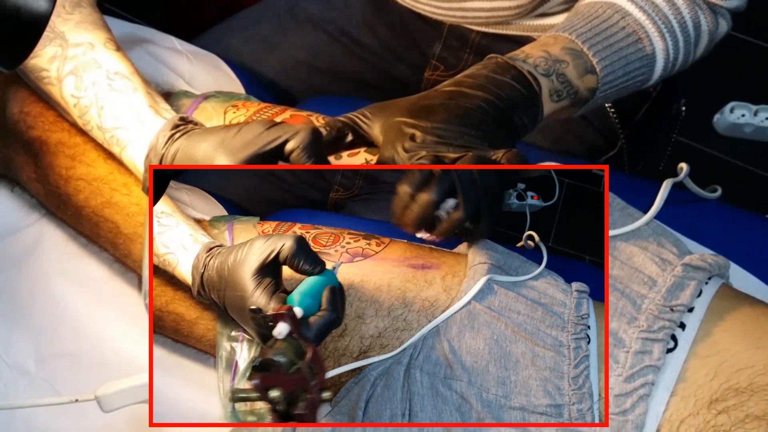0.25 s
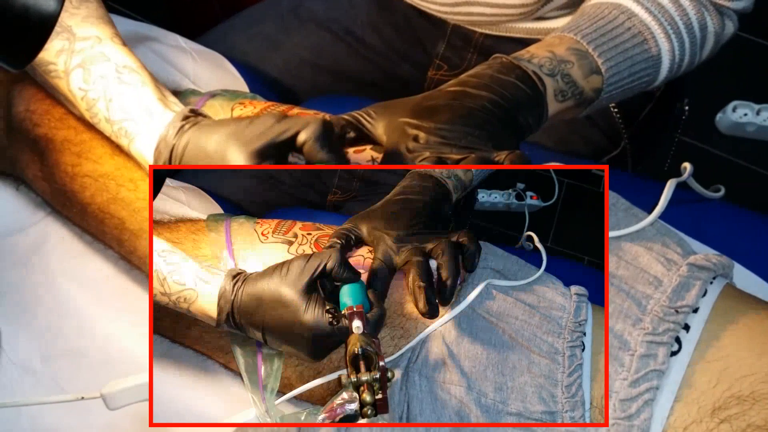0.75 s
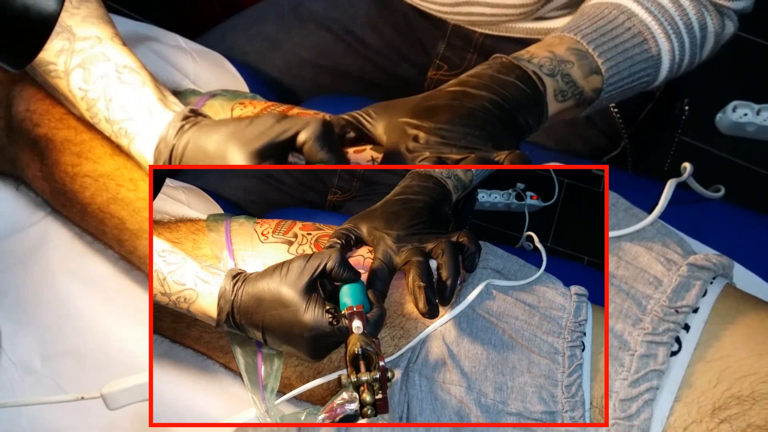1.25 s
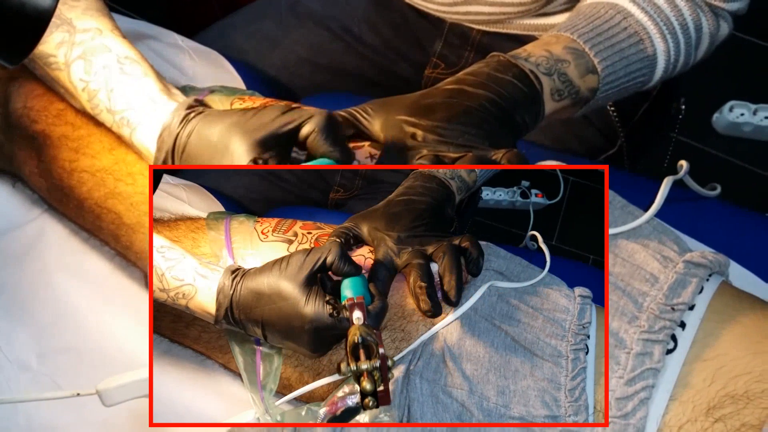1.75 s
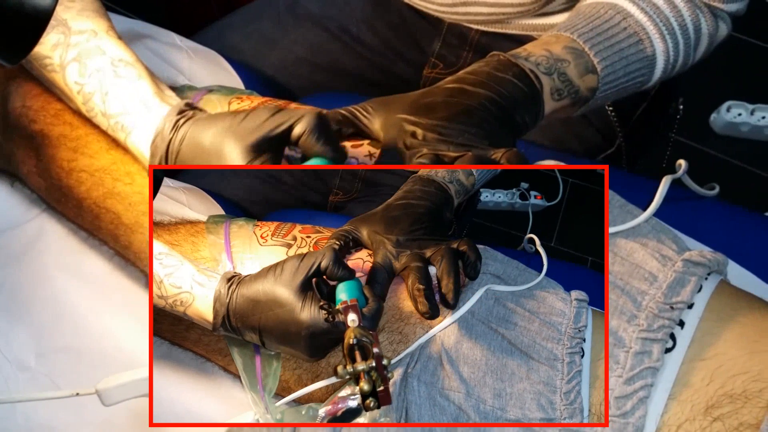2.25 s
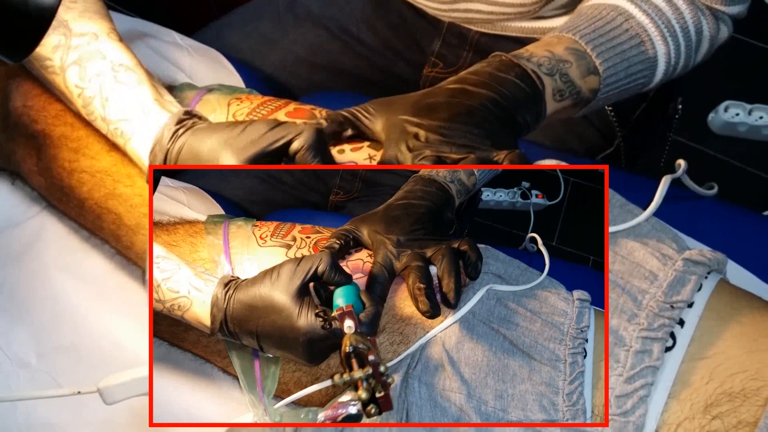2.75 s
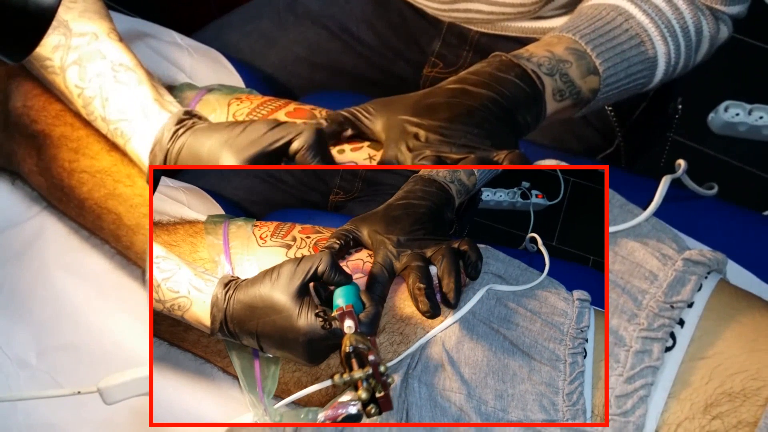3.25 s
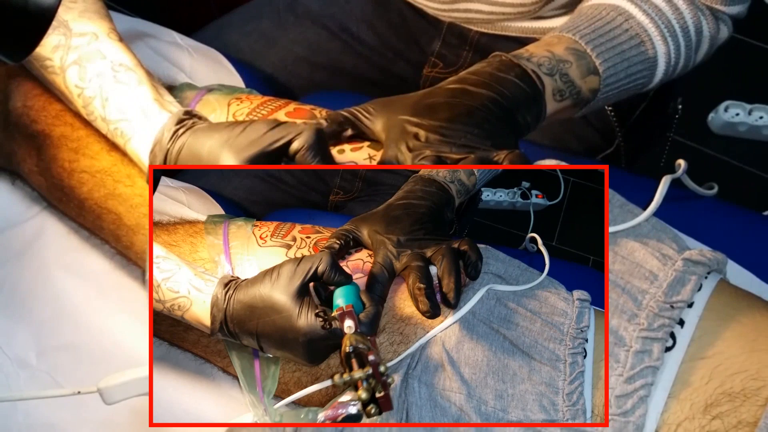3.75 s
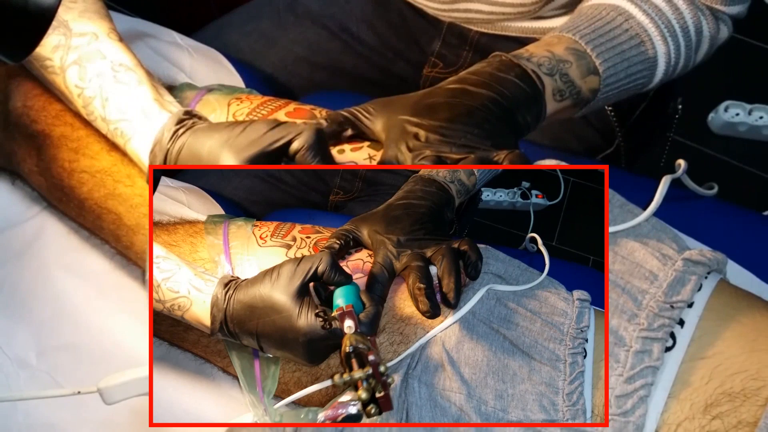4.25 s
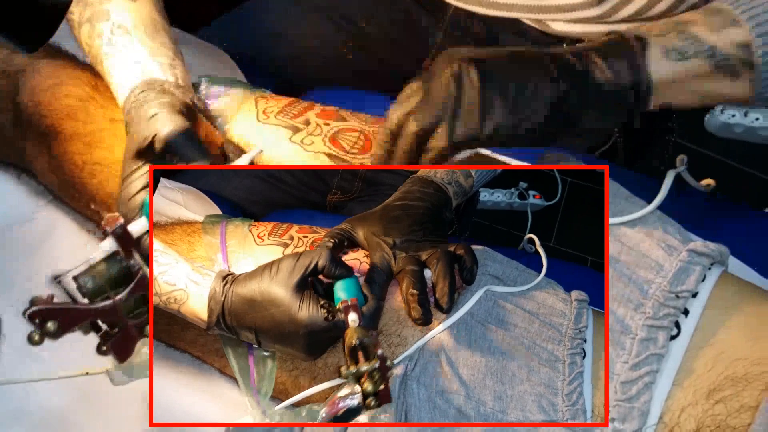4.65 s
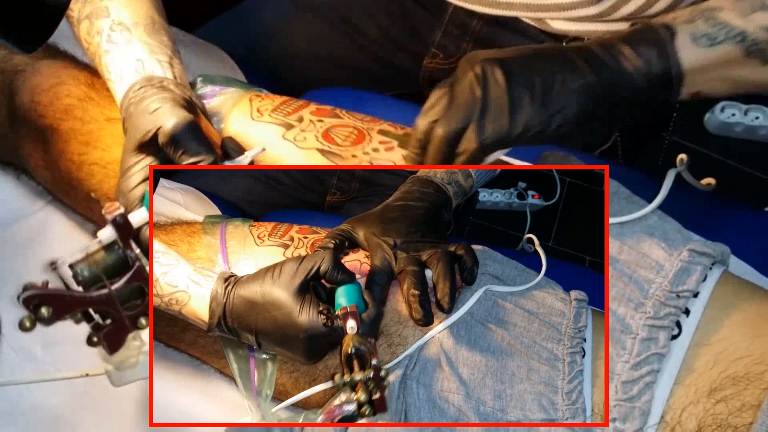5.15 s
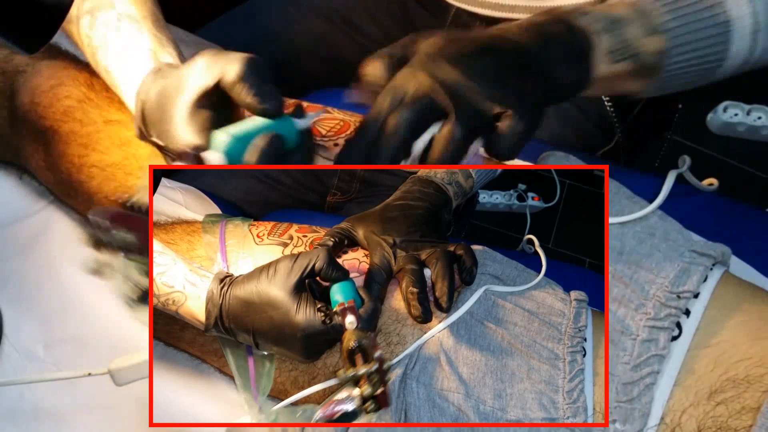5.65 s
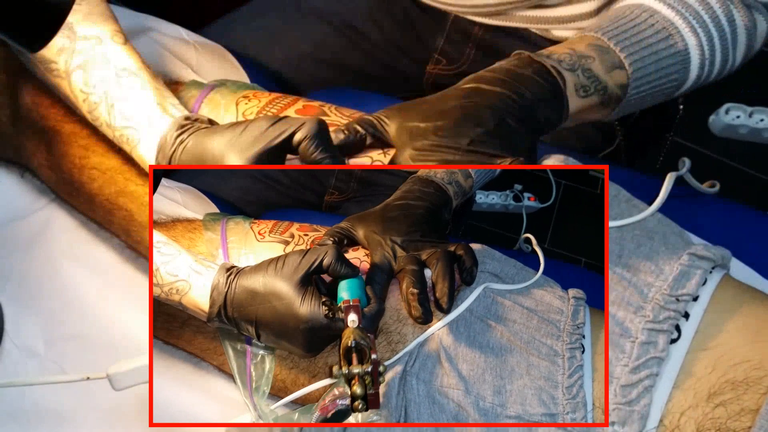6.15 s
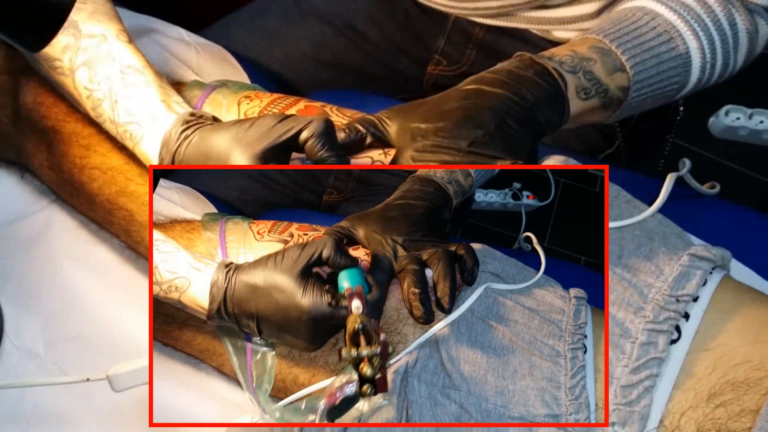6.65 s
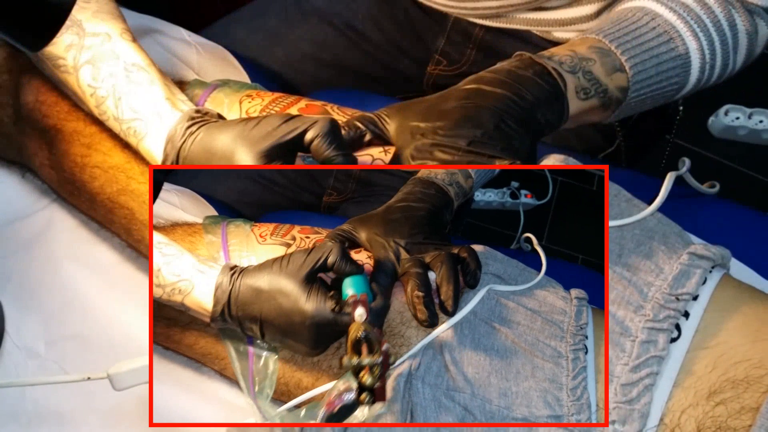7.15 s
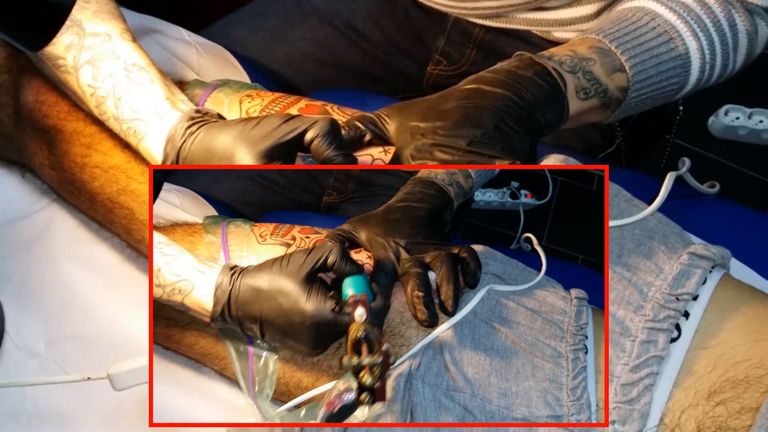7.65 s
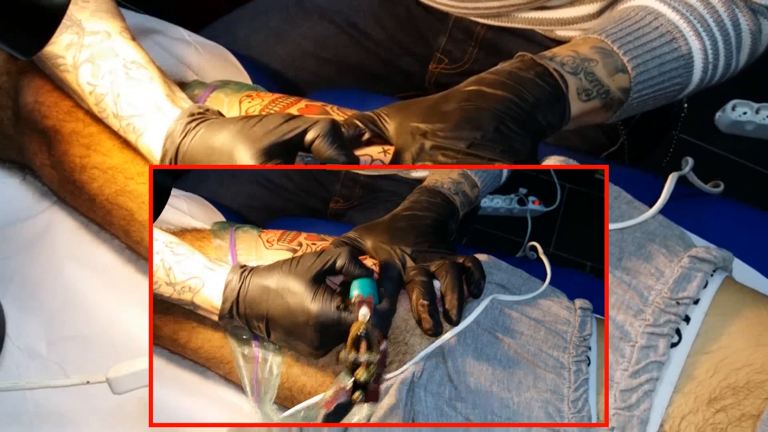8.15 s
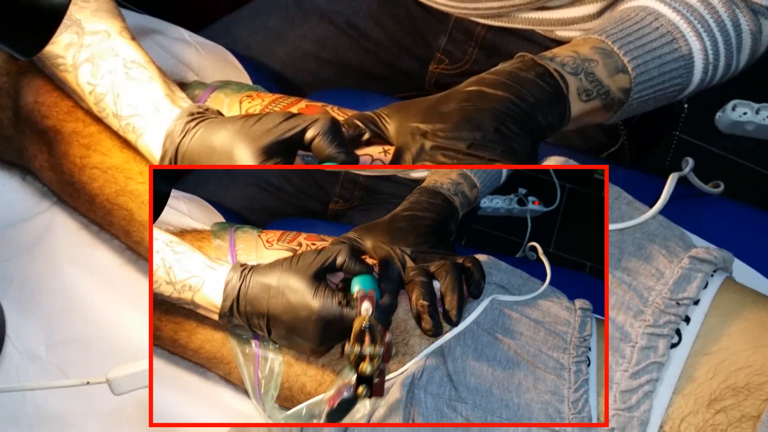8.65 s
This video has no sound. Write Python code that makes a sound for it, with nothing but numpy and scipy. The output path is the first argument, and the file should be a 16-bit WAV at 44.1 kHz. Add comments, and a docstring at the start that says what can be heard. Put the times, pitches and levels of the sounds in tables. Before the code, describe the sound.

A coil tattoo machine buzzes steadily, thin, bright and metallic, its treble chirping and grainy, with tiny ticks and brief dips.

```python
"""A coil tattoo machine buzzes: its armature bar strikes the coil core about 76 times a second.
Each blow sends a noise burst through the resonances of the steel frame, with a short echo 7 ms later.
Delayed copies flange the buzz; low tone ticks, falling chirps and one late pair of thin tones join it.
Coarse rounding of cosine blocks breaks the treble into chirping grains; faint hisses and clicking lie below."""
import sys
import numpy as np
from scipy import signal
from scipy.fft import rfft, irfft
from scipy.io import wavfile
from scipy.ndimage import uniform_filter1d

SR = 44100
rng = np.random.default_rng(int(sys.argv[2]) if len(sys.argv) > 2 else 0)


def undo_db(level):
    """Turn decibels back into plain size, where 20 dB means ten times bigger."""
    steps = np.asarray(level, float) / 20
    return 10 ** steps


def generate_wav(signal):
    """Clip the signal to [-1, 1] and save it as 16-bit WAV at the path in sys.argv[1]."""
    frames = np.transpose(np.atleast_2d(signal))
    scaled = np.clip(frames, -1, 1) * 32767
    pcm = np.round(scaled).astype(np.int16)
    wavfile.write(sys.argv[1], SR, pcm)


N = 393372
BLOCK, GRID = 128, 471  # block hop and block grid offset, samples


def curves(rows):
    """Joins the rows of a table by straight lines in time."""
    s, *columns = np.transpose(rows)
    return [np.interp(np.arange(N) / SR, s, column) for column in columns]


def tremble(per_s):
    """Slow random curve: straight lines between normal draws, per_s of them a second."""
    knots = rng.standard_normal(round(N / SR * 30) + 2)
    return np.interp(np.arange(N) / SR * per_s, np.arange(len(knots)), knots)


def band_of(x, lo_hz, hi_hz, order):
    """Butterworth band-pass."""
    return signal.sosfilt(signal.butter(order, (lo_hz, hi_hz), "bandpass", fs=SR, output="sos"), x)


def loudness(x, size):
    """Running rms, smoothed twice over size samples."""
    power = uniform_filter1d(uniform_filter1d(x ** 2, size), size)
    return np.sqrt(power + 1e-12)


# armature speed: [start_s, blows_per_s]
ARMATURE_SPEED = [(0.0, 77.28), (0.69, 76.7), (1.37, 76.19), (2.06, 75.59), (2.74, 75.49), (3.43, 75.22),
                  (4.12, 75.86), (4.8, 75.33), (5.49, 76.48), (6.18, 75.59), (6.86, 76.09), (7.55, 76.53),
                  (8.23, 76.34), (8.92, 77.65)]
# hardest blows: [start_s, extra_db]
HARDEST_BLOWS = [(2.018, 6.5), (2.297, 4.5), (2.788, 3.5), (2.97, 6.5), (3.118, 6.5), (6.249, 2.5),
                 (6.472, 3), (7.786, 7.5), (8.4, 1.5), (8.724, 5.5)]


def rattle(t60_s, rise_s, spread_db, floor_db, alike):
    """Noise bursts at each blow and dies away; the share alike of its power repeats from blow to blow."""
    first_turn = 0.83  # phase of the armature at the start, turns
    rate, = curves(ARMATURE_SPEED)
    turns = first_turn + np.cumsum(rate) / SR
    blow = turns.astype(int)
    since_s = (turns - blow) / rate
    hard_db = spread_db * rng.standard_normal(blow[-1] + 1)
    for s, extra_db in HARDEST_BLOWS:
        hard_db[blow[round(s * SR)]] += extra_db
    burst = undo_db(hard_db[blow] - 60 * since_s / t60_s) * np.minimum(since_s / rise_s, 1)
    step = np.arange(N) - np.searchsorted(blow, blow)  # samples since the blow
    a, b = rng.standard_normal((2, 1000))[:, step]
    drift = 2 * np.pi * blow / 14  # the repeated shape changes slowly
    repeated = a * np.cos(drift) + b * np.sin(drift)
    noise = np.sqrt(alike) * repeated + np.sqrt(1 - alike) * rng.standard_normal(N)
    return (burst + undo_db(floor_db)) * noise


def ring(x, modes, shake_db, shake_per_s):
    """Resonances that swell and fade slowly by chance; each shifts its pitch to zero, smooths, shifts back."""
    out = np.zeros(N)
    for hz, width_hz, db in modes:
        turn = np.exp(2j * np.pi * np.cumsum(hz * np.ones(N)) / SR)
        r = np.exp(-np.pi * width_hz / SR)
        rung = (turn * signal.lfilter([1 - r], [1, -r], x / turn)).real
        out = undo_db(db + shake_db * tremble(shake_per_s)) * rung - out  # neighbours in opposite phase
    return out


# flanging copies: [longest_delay_s, period_s, longest_delay_at_s, level_db]
FLANGE_COPIES = [(.002, 4, .63, -3.5), (.00133, 2.5, 2.25, -5.5)]


def sweep(x):
    """Adds copies whose delay swings between zero and its longest value, so comb notches sweep."""
    n, out = np.arange(N), x.copy()
    for longest_s, period_s, at_s, db in FLANGE_COPIES:
        lag_s = longest_s * np.cos(np.pi * (n / SR - at_s) / period_s) ** 2
        source = n - np.round(lag_s * SR).astype(int)
        out += undo_db(db) * x[np.maximum(source, 0)]
    return out


# machine in the hand: [start_s, level_db]
HAND_LEVEL = [(0, -16), (.25, -18.5), (.5, -20.5), (1, -18), (1.5, -18), (2.05, -14.5), (2.8, -15),
              (3.55, -15.5), (3.7, -17.5), (4.4, -17), (5.2, -18.5), (5.8, -18), (6.3, -17), (7.1, -16),
              (7.7, -15), (8.25, -15.5), (8.6, -15), (8.92, -12.5)]
# brief dips: [centre_s, depth_db]
LEVEL_DIPS = [(.83, 5.5), (1.18, 2.5), (2.21, 1.5), (2.39, 4.5), (2.828, 1.5), (3.088, 3.5), (3.69, 2.5),
              (4.26, 3.5), (4.429, 2.5), (4.608, 3.5), (4.98, 3), (5.838, 4), (6.2, 5), (6.419, 4.5),
              (6.859, 4.5), (7.05, 2.5), (7.47, 2.5), (8.18, 3), (8.321, 4), (8.678, 0)]


def level():
    """Slow level of the hand, and the same with Gaussian dips and wavering, both in dB."""
    dip_s, rebound = 0.035, 0.23  # half width; share that swings back around a dip
    waver_db, waver_per_s = 0.83, 14
    slow_db, = curves(HAND_LEVEL)
    s, depth_db = np.transpose(LEVEL_DIPS)
    t = np.arange(0, N / SR + 0.01, 0.005)
    u = (t[:, None] - s) / dip_s
    shape = rebound * np.exp(-(u / 3) ** 2) - (1 + rebound) * np.exp(-u ** 2)
    dips_db = np.interp(np.arange(N) / SR, t, (depth_db * shape).sum(1))
    return slow_db, slow_db + dips_db + waver_db * tremble(waver_per_s)


# resonances: [pitch_hz, width_hz, relative_db]; the frame pitches are those at pitch_factor 1
LOW_MODES = [(3786, 500, -13.5), (4831, 320, -0.5), (5723, 350, -1)]
FRAME_MODES = [(6428, 340, -5), (7960, 250, -6), (8534, 320, -9.5), (6907, 340, -6.5)]
FIZZ_MODES = [(9830, 800, -3), (11620, 600, 1), (12660, 800, -1), (13130, 700, -3)]
# machine turns its side, most when lifted away: [start_s, pitch_factor, main_ring_db, low_rattle_db]
TURNING = [(0, 1, 4.5, -4), (.3, 1.024, -4.5, -1), (.75, 1.02, -1.5, 2), (.95, 1.007, 0, 0),
           (2, 0.99, 2.5, 0.15), (3.8, 1.004, 4.5, 0), (4.2, 1, 1, -.3), (6, 0.99, 2, 0.5),
           (8.3, 1.025, 3.5, 0.46), (8.38, 0.99, 2.5, 0), (8.5, .95, -9, -4.5), (8.6, 1.027, -4.5, -5),
           (8.72, 1.11, -4, 1.57), (8.8, 1.06, -3, -2.5), (8.92, 1.037, 9, 0.3)]
# slow level of the fizz: [start_s, fizz_db]
FIZZ_LEVEL = [(0, -2.1), (.4, 0), (6.3, 0.73), (7.2, -0.74), (8.3, -1), (8.55, -4), (8.92, -2)]


def machine():
    """Low rattle, frame and fizz ring on each blow, then pass through flanging and one short echo."""
    main_hz, main_width_hz, lowest_hz = 7300, 300, 3400
    echo_s = 308 / SR
    slow_db, level_db = level()
    pitch, main_db, turned_db = curves(TURNING)
    # mostly the frame swells: low rattle and fizz lose a share of each dB gained
    gained_db = slow_db + 17
    low_db = -6.5 - 0.7 * gained_db + turned_db
    fizz_db = -6 - 1.1 * gained_db + curves(FIZZ_LEVEL)[0]
    frame = [(hz * pitch, width_hz, db) for hz, width_hz, db in FRAME_MODES]
    frame.insert(1, (main_hz * pitch, main_width_hz, main_db))
    # modes, part_db, echo_db, drive
    parts = [(LOW_MODES, low_db, -6.5, rattle(0.018, 0.0018, 1.9, -22, 0.41)),
             (frame, 0, -5.5, rattle(0.012, 0.001, 1.4, -19.5, 0.45)),
             (FIZZ_MODES, fizz_db, -6, rattle(0.01, 0.0005, 1.5, -26.5, 0.42))]
    lag, out = round(echo_s * SR), np.zeros(N)
    for modes, part_db, echo_db, drive in parts:
        rung = ring(drive, modes, shake_db=1, shake_per_s=14)
        sound = sweep(band_of(rung, 3400, 14000, order=4))
        sound[lag:] += undo_db(echo_db) * sound[:-lag].copy()
        out += undo_db(part_db) * sound / loudness(sound, size=9000)
    out *= undo_db(level_db) / loudness(out, size=2400)
    return irfft(rfft(out) * (np.fft.rfftfreq(N, 1 / SR) > lowest_hz), N)


def flicker():
    """Faint hiss at the very top switches on and off by chance, partly unlike left and right."""
    level_db, lo_hz, hi_hz, hold = -59, 13800, 16000, 1024  # hold in samples
    on = np.repeat(rng.random(N // hold + 2) < 0.55, hold)[hold - GRID:][:N]
    hiss = band_of(rng.standard_normal((2, N)), lo_hz, hi_hz, order=8)
    mid, side = hiss * uniform_filter1d(on * 1., 500)
    return undo_db(level_db) * np.array([mid + 0.8 * side, mid - 0.92 * side]) / mid.std()


def patter():
    """Very faint evenly spaced clicks under the buzz, one every two blocks, of random strength."""
    level_db, first_sample = -80, 95
    clicks = np.zeros(N)
    at = np.arange(first_sample, N, 2 * BLOCK)
    clicks[at] = undo_db(4.5 * tremble(26)[at]) * (0.86 + 0.76 * rng.standard_normal(len(at)))
    clicks = band_of(clicks, 40, 3600, order=1)
    return undo_db(level_db) * clicks / clicks.std()


# short low ticks: [centre_s, level_db, first_tone_hz, last_tone_hz]
LOW_TICKS = [(0.133, -37, 2990, 3015), (0.342, -34, 267, 2842), (0.85, -27.5, 3300, 3187),
             (1.084, -33.5, 2580, 2670), (1.398, -32, 3280, 3187), (1.503, -34.5, 2670, 2670),
             (1.596, -30, 2930, 3015), (1.689, -31.5, 88, 2842), (1.808, -21, 2860, 3187),
             (1.991, -29, 1520, 2670), (2.124, -34, 87.4, 86), (2.414, -28, 3220, 3187),
             (2.826, -28, 2830, 2842), (2.84, -29.5, 2680, 2670), (2.919, -38, 86, 3140),
             (2.971, -37.5, 86, 2670), (3.011, -37.5, 260, 1120), (3.131, -23, 3193, 3187),
             (3.198, -33, 88, 1464), (3.25, -32, 2500, 2498), (3.29, -31, 87, 431),
             (3.291, -37.5, 2870, 3187), (3.343, -32, 86, 1292), (3.383, -27.5, 87.6, 3187),
             (3.634, -25.5, 3190, 3015), (3.662, -30, 88.5, 3015), (3.688, -28, 2830, 2842),
             (4.045, -29, 82.6, 1981), (4.15, -37, 263, 258), (4.811, -39, 86.6, 603),
             (4.945, -28, 82.6, 86), (5.287, -33, 1115, 3187), (5.537, -30.5, 2700, 2670),
             (5.59, -33, 2842, 3187), (5.694, -35, 1540, 1637), (5.7, -44, 86, 86),
             (5.798, -33, 2730, 2842), (5.85, -33, 3015, 3015), (6.221, -32.5, 810, 1292),
             (6.379, -39, 1470, 3187), (6.524, -38.5, 86, 86), (6.565, -44, 86.6, 3187),
             (6.658, -36, 1292, 1292), (6.814, -29, 3000, 3015), (6.852, -28, 84, 86),
             (6.867, -40, 267, 1120), (7.377, -42, 263, 1637), (7.472, -29.5, 90.5, 3187),
             (8.098, -28.5, 3110, 3187), (8.84, -40, 1500, 1981)]
# runs of ticks that fall in pitch: [start_s, length_s, level_db, first_hz, last_hz]
FALLING_CHIRPS = [(3.184, 0.0087, -26, 2440, 2320), (4.855, 0.0093, -21, 2140, 1840),
                  (6.544, 0.0088, -17.5, 2255, 1906), (6.629, 0.0055, -22, 2330, 2170)]


def ticks():
    """Each tick is a 6 ms sine-shaped swell of one to eight tones spread over its band."""
    chirp_step_s, chirp_width_hz = 0.004, 380
    faint_per_s, faint_db, faint_lo_hz, faint_hi_hz = 0.9, -35, 2490, 3080
    rows = list(LOW_TICKS)
    for start_s, length_s, db, first_hz, last_hz in FALLING_CHIRPS:
        count = 1 + round(length_s / chirp_step_s)
        for s, hz in np.linspace((start_s, first_hz), (start_s + length_s, last_hz), count):
            rows.append((s, db, hz - chirp_width_hz / 2, hz + chirp_width_hz / 2))
    # faint one-tone ticks fall by chance
    for when, pitch in rng.random((round(faint_per_s * N / SR), 2)):
        hz = faint_lo_hz + (faint_hi_hz - faint_lo_hz) * pitch
        rows.append((0.01 + when * (N / SR - 0.02), faint_db, hz, hz))
    n, out = np.arange(2 * BLOCK), np.zeros(N)
    swell = np.sin(np.pi * (n + 0.5) / (2 * BLOCK))
    for (s, db, lo_hz, hi_hz), chance in zip(rows, rng.random((len(rows), 8))):
        count = min(1 + round((hi_hz - lo_hz) / 450), 8)
        cycles = np.outer(np.linspace(lo_hz, hi_hz, count), n / SR) + chance[:count, None] / 2
        tones = np.cos(2 * np.pi * cycles).sum(0)
        at = round(s * SR) - BLOCK
        out[at:at + 2 * BLOCK] += undo_db(db) * swell * tones / np.sqrt(count)
    return out


def thin_tones():
    """Two thin tones swell and fade together."""
    start_s, length_s, level_db = 8.522, 0.039, -30
    t = np.arange(N) / SR - start_s
    swell = np.sin(np.pi * np.clip(t / length_s, 0, 1))
    return undo_db(level_db) * swell * sum(np.sin(2 * np.pi * hz * t) for hz in (2960, 3560))


def few_bits(x, kept, wobble, lo_hz):
    """Rounds 6 ms cosine blocks above lo_hz; per eight blocks the step spares only the strongest bins."""
    n, k = np.arange(2 * BLOCK)[:, None] + 0.5, np.arange(BLOCK) + 0.5
    window = np.sin(np.pi * n / (2 * BLOCK))
    basis = np.cos(np.pi / BLOCK * (n + BLOCK / 2) * k) * window * np.sqrt(2 / BLOCK)
    front, groups = 8 * BLOCK - GRID + 3 * BLOCK, N // (8 * BLOCK) + 3
    padded = np.zeros((8 * groups + 1) * BLOCK)
    padded[front:front + N] = x
    frames = np.lib.stride_tricks.sliding_window_view(padded, 2 * BLOCK)[::BLOCK]
    c = (frames @ basis).reshape(groups, 8, BLOCK)
    share = np.clip(kept * np.exp(wobble * rng.standard_normal(groups)), 0.02, 0.5)
    ranked = -np.sort(-abs(c).reshape(groups, -1), axis=1)
    edge = ranked[np.arange(groups), (share * 8 * BLOCK).astype(int)]
    step = (edge * 0.5946 ** (-4 / 3) + 1e-9)[:, None, None]  # bins below edge round to zero
    rounded = np.sign(c) * step * np.floor((abs(c) / step) ** 0.75 + 0.4054) ** (4 / 3)
    c = np.where(k * SR / (2 * BLOCK) > lo_hz, rounded, c)
    blocks = c.reshape(-1, BLOCK) @ basis.T
    out = np.zeros_like(padded)  # overlap-add
    out[:-BLOCK] += blocks[:, :BLOCK].ravel()
    out[BLOCK:] += blocks[:, BLOCK:].ravel()
    return out[front:front + N]


def scene():
    """Machine, ticks, patter and a faint room hiss, alike in both channels."""
    room_db = -83
    mono = machine() + ticks() + patter() + undo_db(room_db) * rng.standard_normal(N)
    return np.array([mono, mono])


def roll_off(x):
    """The treble ends steeply here."""
    return signal.sosfilt(signal.butter(12, 15830, fs=SR, output="sos"), x)


def record(dry):
    """Stores the treble coarsely, clips at full scale, then adds the thin tones and the top hiss."""
    stored = np.clip(few_bits(dry[0], kept=0.092, wobble=0.2, lo_hz=3300), -1, 1)
    mix = stored + thin_tones() + flicker()
    return roll_off(mix)


dry = scene()
out = record(dry)
generate_wav(out)
```